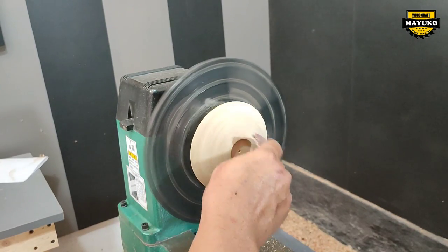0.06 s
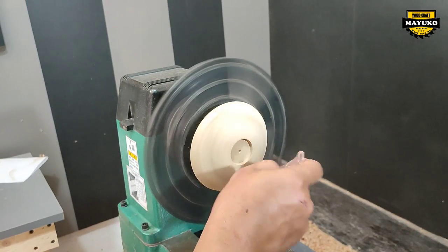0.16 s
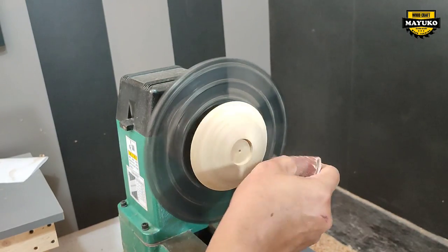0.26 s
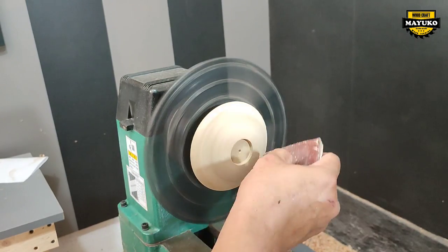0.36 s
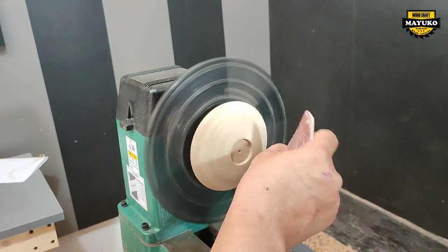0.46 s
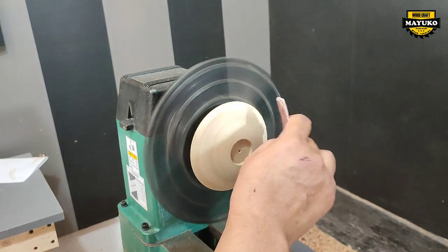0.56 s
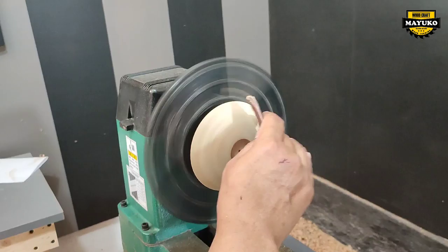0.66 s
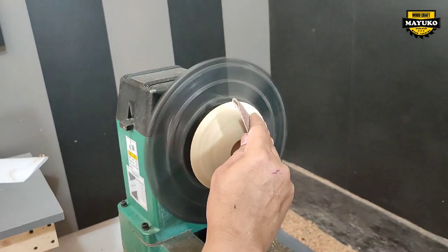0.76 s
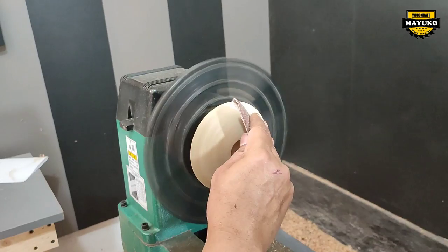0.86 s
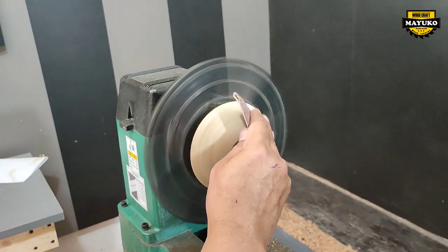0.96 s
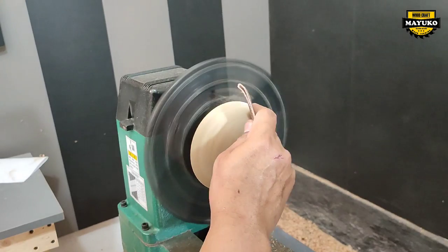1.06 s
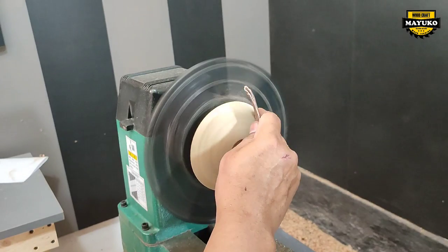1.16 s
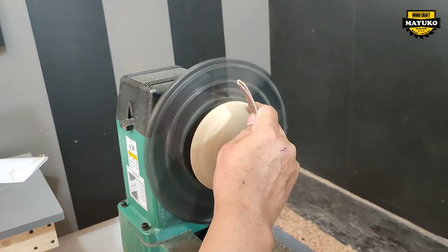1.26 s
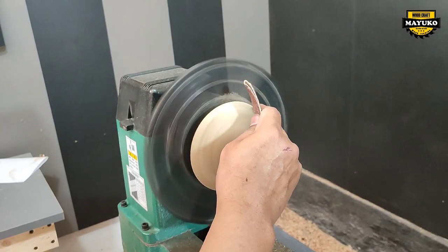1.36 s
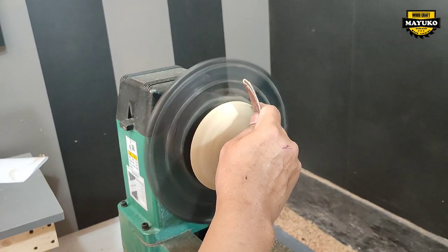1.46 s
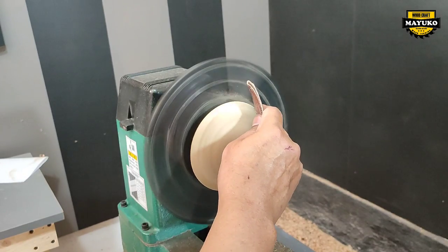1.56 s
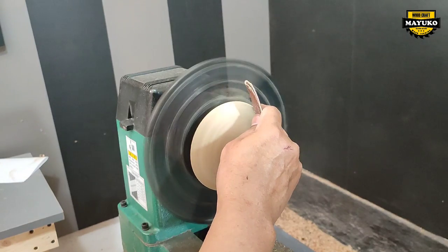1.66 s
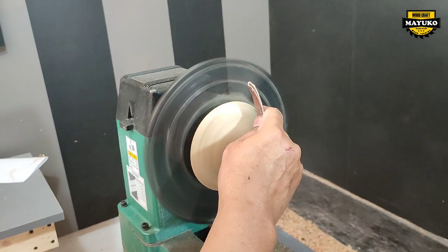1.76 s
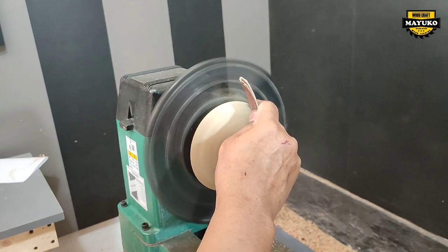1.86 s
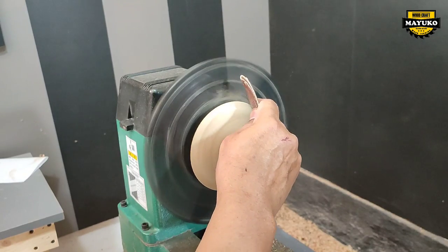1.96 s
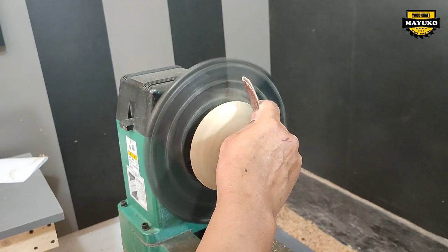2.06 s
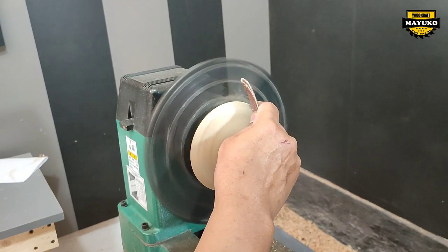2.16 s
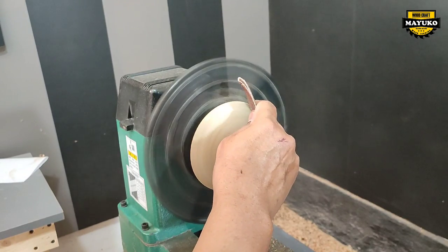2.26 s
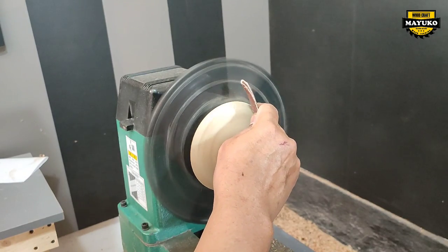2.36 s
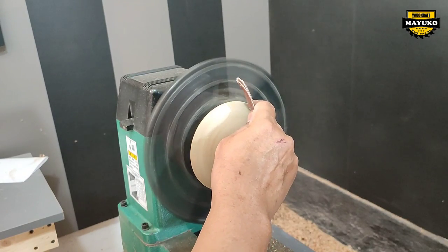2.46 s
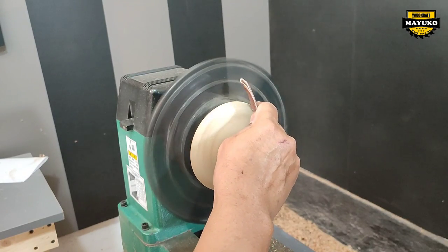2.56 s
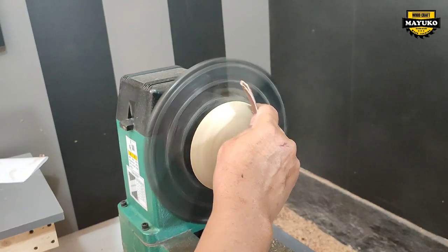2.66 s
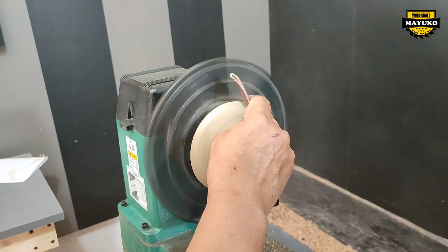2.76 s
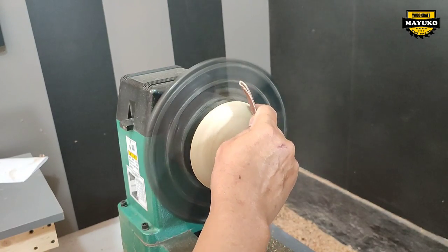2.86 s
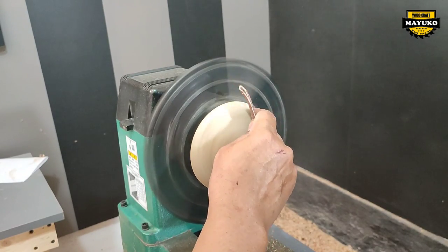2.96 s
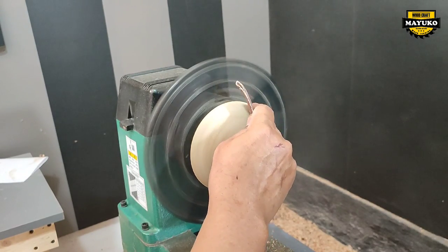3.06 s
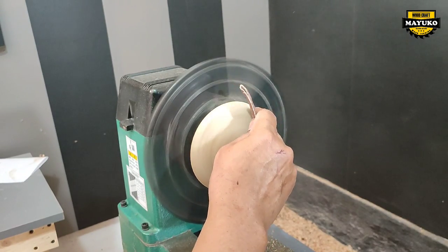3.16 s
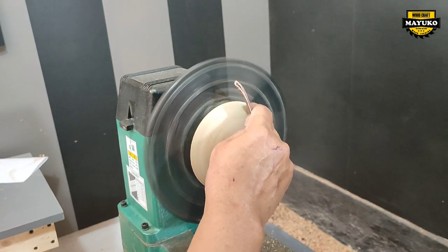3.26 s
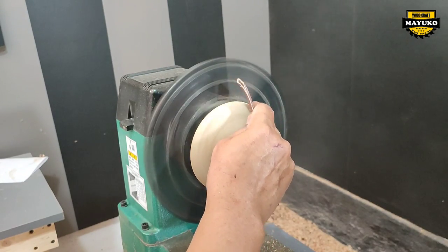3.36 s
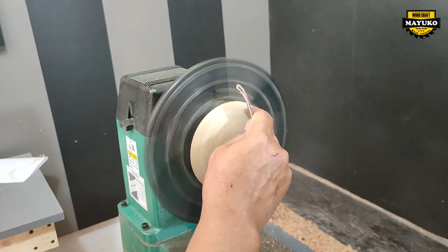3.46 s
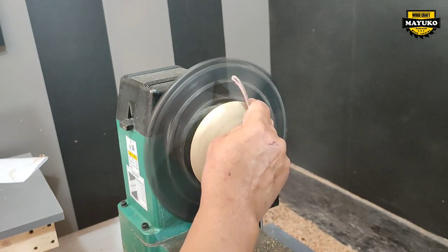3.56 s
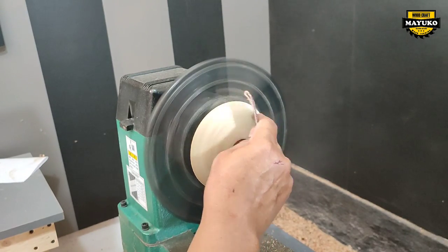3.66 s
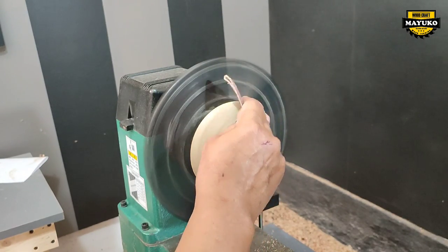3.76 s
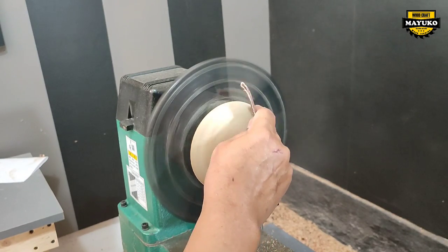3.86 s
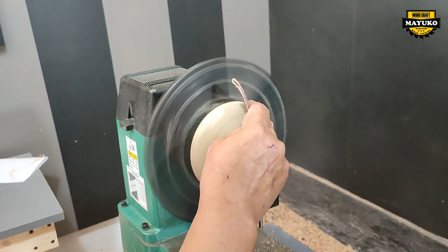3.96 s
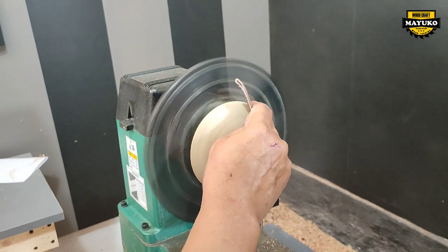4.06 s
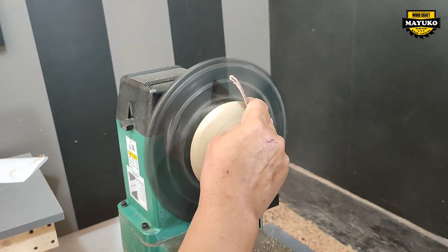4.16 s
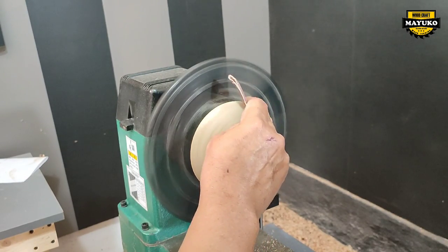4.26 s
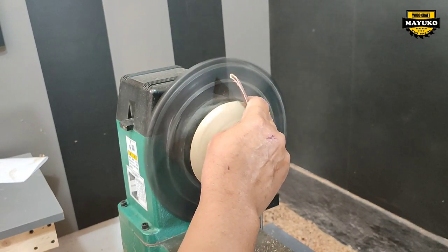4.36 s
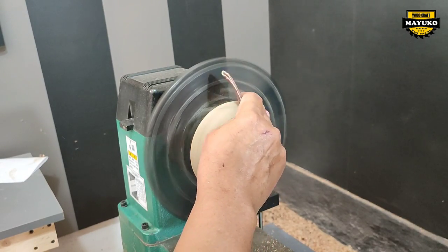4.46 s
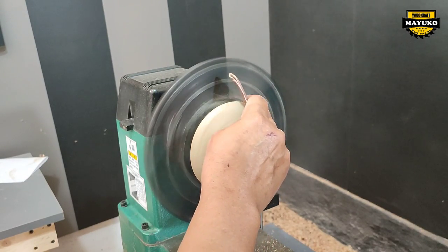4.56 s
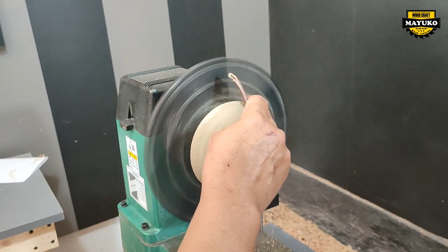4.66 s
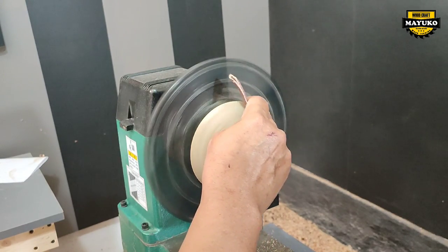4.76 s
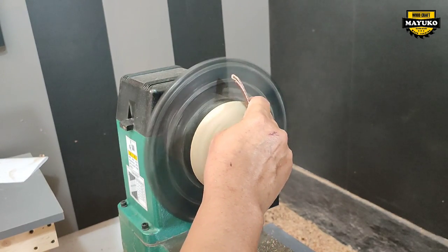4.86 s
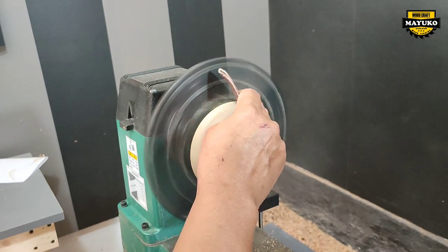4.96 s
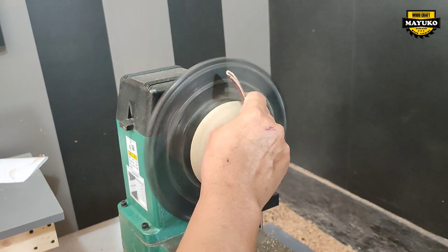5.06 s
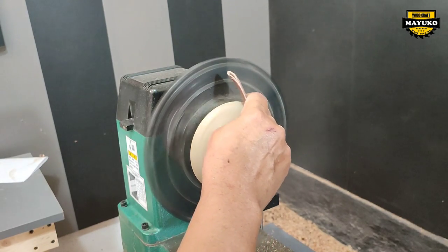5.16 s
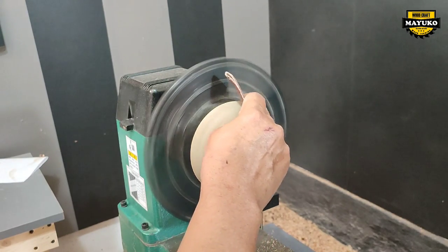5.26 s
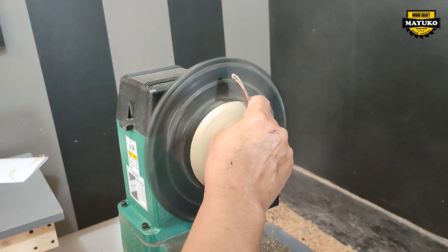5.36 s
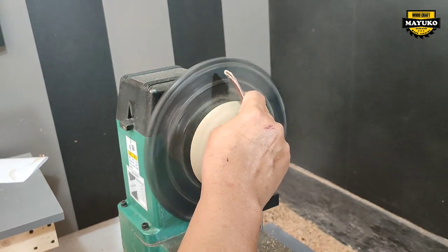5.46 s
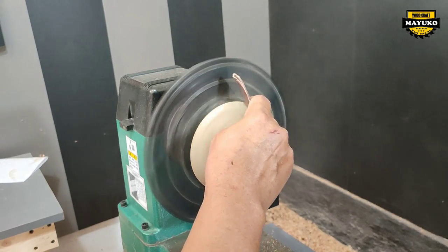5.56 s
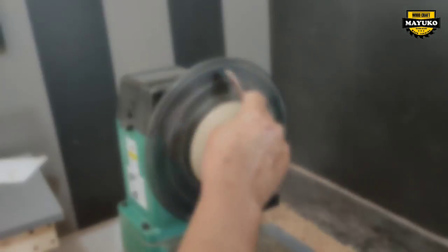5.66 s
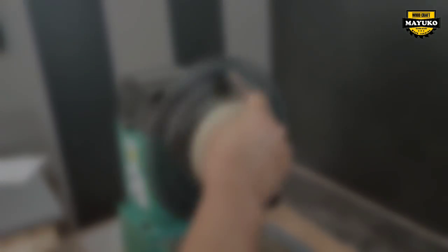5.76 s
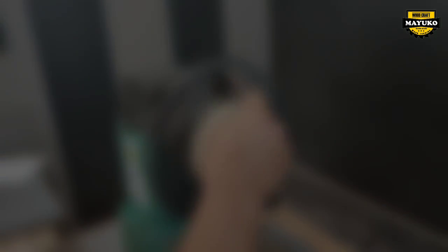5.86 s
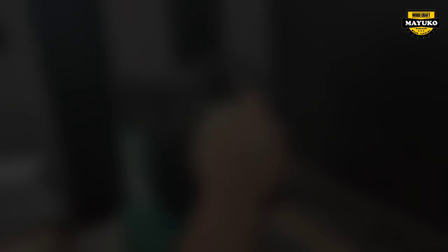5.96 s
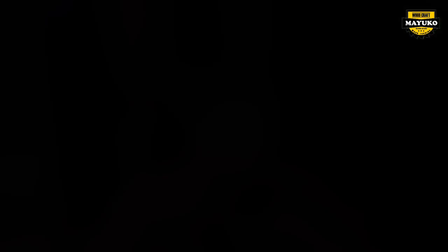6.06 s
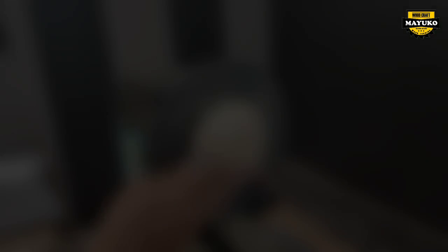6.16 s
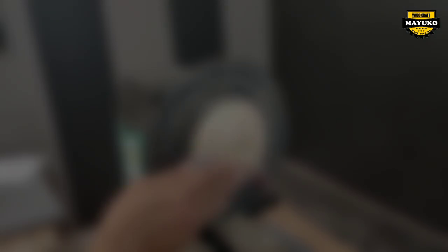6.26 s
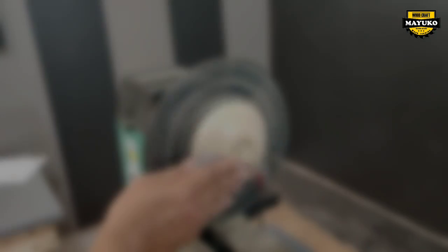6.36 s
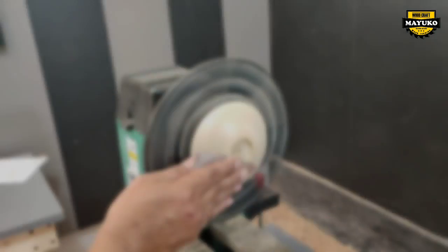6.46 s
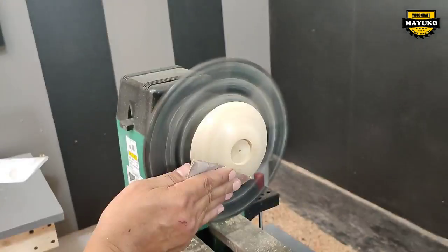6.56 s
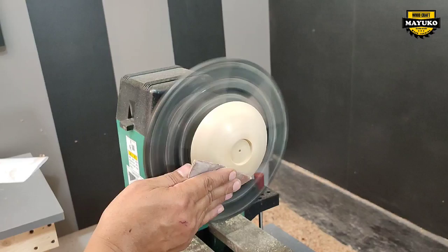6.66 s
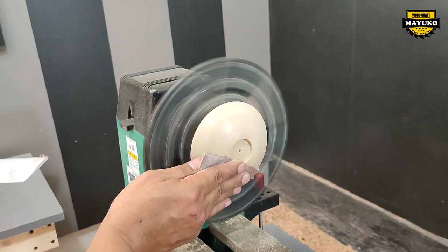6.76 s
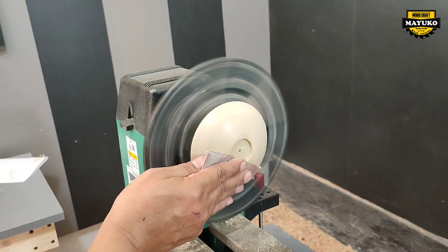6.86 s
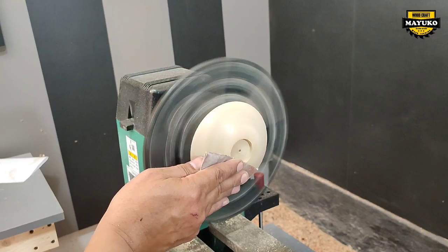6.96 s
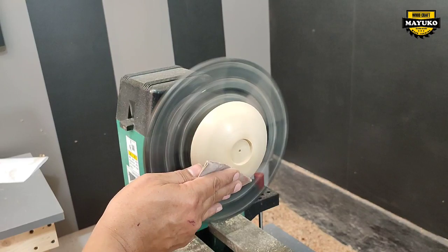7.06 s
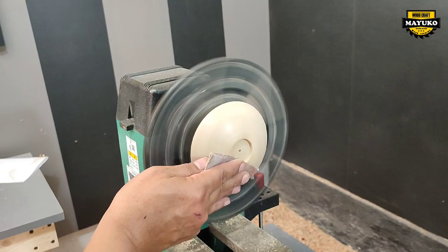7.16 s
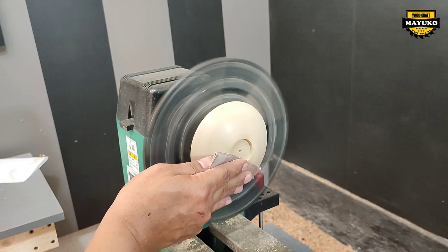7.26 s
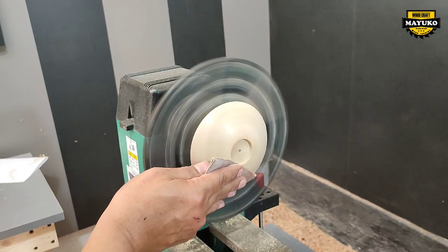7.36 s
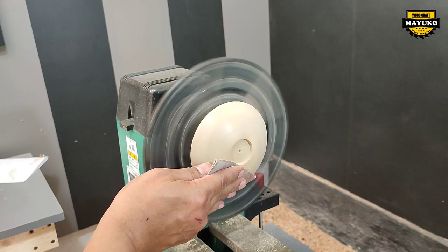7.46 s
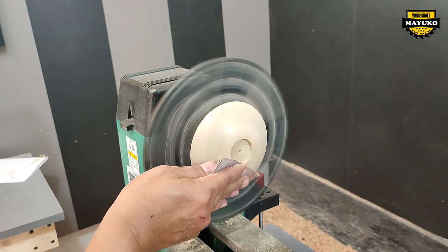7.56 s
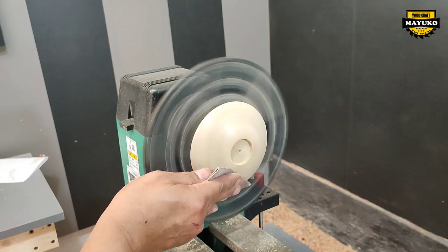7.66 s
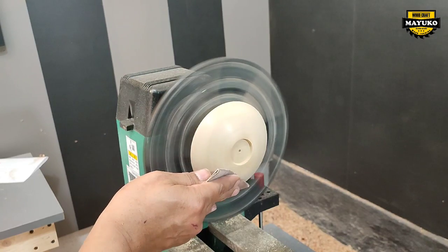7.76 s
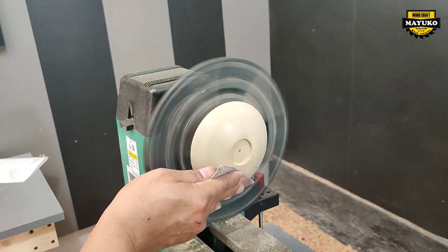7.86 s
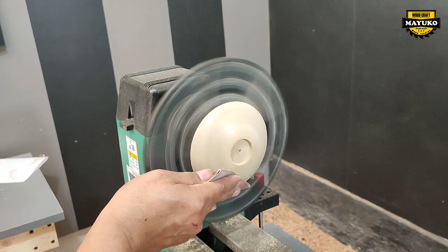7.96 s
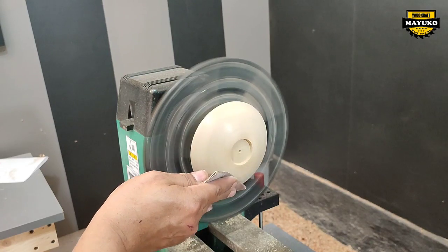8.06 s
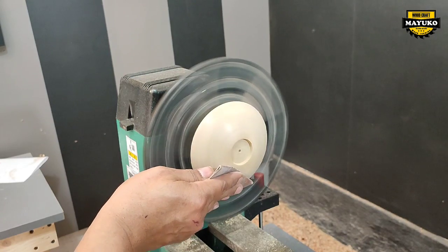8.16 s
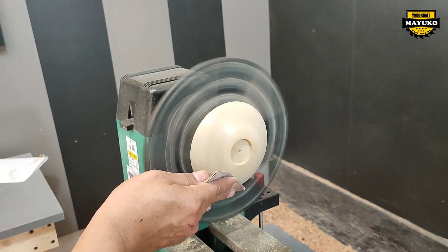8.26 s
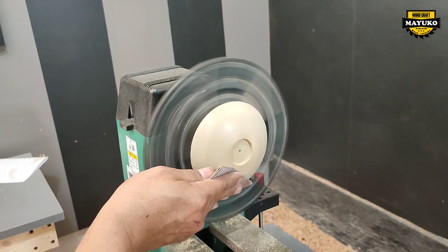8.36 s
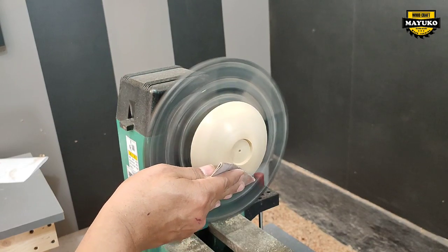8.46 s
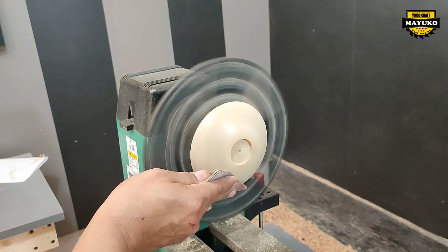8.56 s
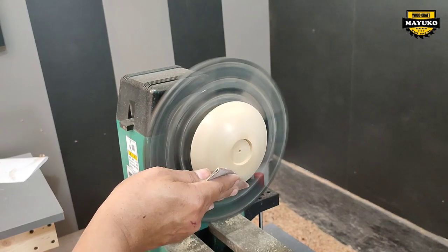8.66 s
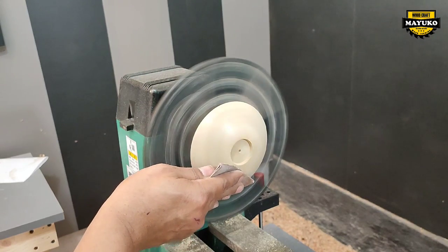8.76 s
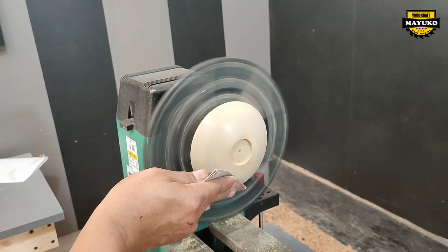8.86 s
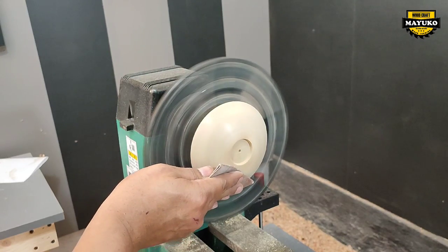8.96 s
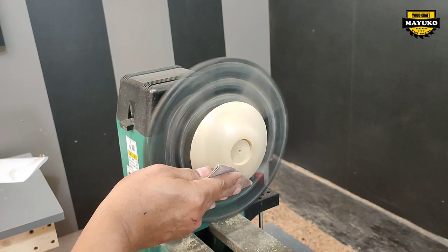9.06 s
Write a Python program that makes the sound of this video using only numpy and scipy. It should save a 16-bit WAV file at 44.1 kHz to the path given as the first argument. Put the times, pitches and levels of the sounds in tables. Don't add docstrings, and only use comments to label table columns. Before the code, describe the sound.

A wood lathe runs throughout, heard close in a small workshop: steady electric hum, many slightly wavering motor and belt tones, airy fan and bearing whirr, and lumpy low rumble. At the start coarse sandpaper hisses loudly on the spinning bowl, then lifts at about 0.2 s with a quick short tail, leaving the motor alone. At 0.84 s the paper touches again with a small woody knock, and by about 0.95 s it is pressing firmly. A dense, bright, gritty hiss continues to 6.1 s, throbbing about thirty times a second with the grain, its pressure varying slightly; the bowl's midrange ringing grows as the paper seats, the motor sags a little and low thuds join. At 6.1 s an abrupt cut with a slight click drops the level sharply: fine paper rubs with a soft, smooth, fluttering hiss, easing slightly until the end at about 9 s, the motor now clearly exposed.

```python
import sys
import numpy as np
from scipy import signal
from scipy.fft import rfft, irfft
from scipy.io import wavfile
from scipy.ndimage import uniform_filter1d

SR = 44100
rng = np.random.default_rng(int(sys.argv[2]) if len(sys.argv) > 2 else 0)


def waveform_to_disk(signal):
    frames = np.transpose(np.atleast_2d(signal))
    scaled = np.clip(frames, -1, 1) * 32767
    samples = np.round(scaled).astype(np.int16)
    wavfile.write(sys.argv[1], SR, samples)


def elevation(decibels):
    levels = np.asarray(decibels, float)
    return 10 ** (levels / 20)


N = 401306

# frequency in Hz, left level in dB, right level in dB.
COARSE_HISS = [(900, -19.5, -26.5), (1500, -16.5, -14), (2130, -7.5, -12), (3470, -5.5, -3),
               (4900, -5.5, -3.5), (4990, -3.5, -1.5), (5940, -1.5, -2), (7510, 0.5, 4.5), (8030, -0.5, -2),
               (8600, 0.5, -8), (9330, -6, -4.5), (10020, -11.5, -10), (12200, -9.5, -8), (15400, -13, -11)]
# frequency in Hz, left level in dB, right level in dB.
FINE_HISS = [(1500, -9, -2), (3400, -4, -2.5), (5830, -3.5, -4), (6650, 0, -1), (7400, -1, 3.5),
             (8400, -2, -6.5), (10100, -6, -4.5), (12100, -5, -3.5), (14400, -4, -4.5)]
# frequency in Hz, likeness from -1 to 1.
HISS_SAME = [(900, 0.11), (1500, -0.28), (2000, 0.73), (2600, 0.21), (3300, 0.013), (4300, -0.048),
             (5400, -0.14), (6500, -0.057), (14300, -0.048)]
# time in s, hiss level in dB.
PRESSURE = [(0.843, -53), (0.873, -38.5), (0.9, -42.5), (0.935, -30), (1.08, -29.5), (1.14, -31),
            (1.45, -30.5), (1.7, -28.5), (2.9, -29.5), (3.19, -30.5), (3.5, -30.5), (4.05, -31), (4.8, -30),
            (5.3, -30), (5.6, -31), (5.85, -29.5), (6.13, -29.5)]
# frequency in Hz, width in Hz, level in dB, left minus right in dB,
# left-right likeness from 0 to 1.
BOWL = [(1787, 183, -5.5, -0.5, 0.56), (1937, 57, -2.5, 2, 0.88), (2160, 130, -9.5, 4, 0.12),
        (2497, 270, -7.5, 1.5, 0.68), (2982, 172, 0.5, -6, 0.39), (3140, 133, -4.5, 0.5, 0.38)]
# time in s, resonance in Hz, level in dB re hiss.
HAND_GAP = [(0, 6800, -12), (1, 6940, -6), (2, 7800, -22), (3.5, 7700, -13), (4.5, 8640, -6.5),
            (6.2, 8600, -6.5)]
# frequency in Hz, width in Hz, level in dB.
CANCELS = [(2280, 50, -4), (3335, 45, -6)]
# times a turn, depth in dB, phase in radians.
HISS_THROB = [(1, 0.43, 1.5), (2, 1.01, -2.5), (4, 0.37, 4.5)]
BOWL_THROB = [(1, 0.32, 0.44), (2, 1.8, 3.6), (4, 0.25, 0.16)]
FINE_THROB = [(1, .3, 1.1), (2, 0.97, 7.5), (4, .15, -8)]
# frequency in Hz, level in dB, left minus right in dB, left lead in
TONES = [(47.3, -65.0, 4.0, 0.2, 0.95), (60.7, -64.0, 8.0, 0.3, 0.95), (100.0, -58.0, -0.0, 0.0, 0.35),
         (122.7, -68.0, 1.0, -0.0, 0.92), (199.0, -60.5, 2.0, -0.1, 0.7), (230.6, -65.0, -0.0, 0.1, 0.95),
         (248.5, -66.0, 0.0, -0.2, 0.95), (299.0, -66.0, -0.0, -0.5, 0.75), (331.5, -49.0, 4.0, -0.6, 0.47),
         (346.4, -50.0, -1.0, -0.3, 0.54), (360.5, -62.0, 3.0, 0.0, 0.81), (370.2, -62.0, 6.0, -0.1, 0.78),
         (381.5, -65.0, 1.0, -0.1, 0.89), (400.1, -49.0, -4.0, 0.4, 0.3), (442.0, -57.0, 3.0, -0.6, 0.65),
         (471.5, -62.0, 7.0, -0.3, 0.9), (499.5, -63.0, 4.0, -0.2, 0.9),
              (511.5, -62.0, 1.0, -0.8, 0.7), (548.9, -60.0, 7.0, 1.8, 0.82),
              (570.4, -63.0, -7.0, -1.2, 0.64), (595.4, -64.0, 5.0, 0.1, 0.82),
              (620.2, -59.0, 5.0, 0.7, 0.95), (649.3, -63.0, 5.0, 1.1, 0.95), (670.0, -55.5, 14, 0.6, 0.95),
              (700.0, -55.0, 4.0, -0.4, 0.85), (725.1, -68.0, 6.0, -0.5, 0.72),
              (940.8, -71, 2.0, -1.3, 0.95), (1213.9, -65.0, 4.0, 1.1, 0.88),
              (1227.7, -66.0, 4.0, 1.3, 0.9), (1479.2, -66.0, 6.0, -0.5, 0.82)]
# frequency in Hz, level in dB per Hz.
WHIRR = [(20, -10.5), (60, -32), (85, -23), (220, -13), (340, -13), (420, -12.5), (650, -12.5),
         (900, -18.5), (1600, -17), (2100, -25), (4500, -37), (7500, -37), (8500, -43), (14300, -46.5)]
# frequency in Hz, likeness from -1 to 1.
WHIRR_SAME = [(60, 0.94), (130, 1), (290, 0.51), (640, -0.17), (1400, -0.00063), (3090, -0.062),
              (6790, -0.15), (14900, -0.07)]
# frequency in Hz, width in Hz, level in dB.
HOUSING = [(2470, 115, -62), (3000, 120, -65.5)]
# treble in dB re its loudest, margin in
# dB, extra margin above 5.3 kHz in dB.
WEAK_MARGIN = [(-40, 8, -5.5), (-30, 3.8, .3), (-13, 4.2, .3), (-7, 1.9, 2.4)]

COARSE_TURN_HZ, FINE_TURN_HZ = 14.98, 14.94
TOUCH_S, CHANGE_S = 0.8405, 6.135
HELD_DB, LIFT_S, LIFT_DB_PER_S, TAIL_DB, TAIL_DB_PER_S = -32, 0.18, 225, -4, 102
RING_HELD_DB, RING_LIFTED_DB, RING_DB, RING_WANDER_DB = -3, -8.5, -4.5, 1.5
DAMPED_DB, SEAT_S = -17.5, 0.48
KNOCK_DB, KNOCK_DB_PER_S, KNOCK_RISE_S = -38.5, 70, 0.017
GRIT_DB, GRIT_PER_DB, GRIT_UNSEATED_DB, GRIT_SEAT_S = -1.13, 0.3, -5.5, 0.28
HAND_WANDER_DB = 0.5
FINE_DB, FINE_SAG_DB_PER_S, FINE_WANDER_DB, FINE_RISE_S = -55.5, 0.34, 0.3, 0.018
ROTOR_HZ, MAINS_HUM_HZ = 24.8, 100
BELT_LAP_HZ, BELT_LAP_DB, BELT_LAP_RAD = 2.3, 0.5, 0.3
SHAKE_DB, SHAKE_PRESSED_DB, SHAKE_PER_DB, GUST_DB = -54.5, 3.5, 2.5, 2


def column(rows, k, at):
    rows = np.asarray(rows)
    return np.interp(at, rows[:, 0], rows[:, k])


def column_by_pitch(rows, k, hz):
    rows = np.asarray(rows)
    return np.interp(np.log(hz + 1), np.log(rows[:, 0]), rows[:, k])


def evened(x):
    return x / np.sqrt(np.mean(np.abs(x) ** 2) + 1e-20)


def pair(same):
    a, b = rfft(rng.standard_normal((2, N)))
    same = np.clip(same, -1, 1)
    return np.array([a, same * a + np.sqrt(1 - same ** 2) * b])


def drift(rate_hz, count):
    knots = rng.standard_normal((count, int(N / SR * rate_hz) + 4))
    at = np.arange(N) / SR * rate_hz
    k = at.astype(int)
    ease = 0.5 - 0.5 * np.cos(np.pi * (at % 1))
    return evened(knots[:, k] * (1 - ease) + knots[:, k + 1] * ease)


def resonate(x, hz, width):
    turn = np.exp(2j * np.pi * np.cumsum(hz * np.ones(N)) / SR)
    r = np.exp(-np.pi * width / SR)
    return 2 * (turn * signal.lfilter([1 - r], [1, -r], x / turn)).real


def throb(rows, turn_hz):
    angle = 2 * np.pi * turn_hz * np.arange(N) / SR + 0.27 * drift(1.28, count=1)[0]
    return elevation(sum(db * np.cos(k * angle + phase) for k, db, phase in rows))


def grit(colour, patchy_db, flicker_db, same):
    hz = np.fft.rfftfreq(512, 1 / SR)
    z = signal.stft(irfft(pair(same), N), nperseg=512, noverlap=384)[2]
    patches = uniform_filter1d(rng.standard_normal(z.shape), size=6, axis=1)
    patches = uniform_filter1d(patches, size=18, axis=2)
    tone_db = np.array([column_by_pitch(colour, side, hz) for side in (1, 2)])
    z = z * elevation(tone_db[:, :, None] + patchy_db * evened(patches)) * (hz > 600)[:, None]
    hiss = signal.istft(z, nperseg=512, noverlap=384)[1][:, :N]
    return evened(hiss) * elevation(flicker_db * (drift(14, count=1) + 0.91 * drift(150, count=1)))


def pressure_db(t):
    since = np.maximum(t - LIFT_S, 0)
    quick = elevation(-LIFT_DB_PER_S * since)
    tail = elevation(TAIL_DB - TAIL_DB_PER_S * since)
    first_db = HELD_DB + 10 * np.log10((quick ** 2 + tail ** 2) / (1 + elevation(2 * TAIL_DB)))
    return np.where(t < TOUCH_S, first_db, column(PRESSURE, 1, t))


def coarse_hiss(level_db):
    t, hz = np.arange(N) / SR, np.fft.rfftfreq(N, 1 / SR)
    since = np.maximum(t - TOUCH_S, 0)
    hiss = grit(COARSE_HISS, patchy_db=1.47, flicker_db=0.0, same=column(HISS_SAME, 1, hz))
    top = irfft(rfft(hiss) * np.clip((hz - 9000) / 800, 0, 1), N)
    grit_db = GRIT_DB - GRIT_PER_DB * np.clip(-31.5 - level_db, 0, 25)
    grit_db = grit_db + (t > TOUCH_S) * GRIT_UNSEATED_DB * np.exp(-(since / GRIT_SEAT_S) ** 2)
    hiss = hiss + top * (elevation(grit_db + 6.5) - 1)
    dull = irfft(rfft(hiss) * np.exp(-((hz - 3900) / 1300) ** 2), N)
    hiss = hiss + dull * (elevation(0.17 * np.clip(-30.5 - level_db, 0, 25)) - 1)
    gap_hz = column(HAND_GAP, 1, t)
    gap = resonate(resonate(rng.standard_normal(N), gap_hz, 900), gap_hz, 900)
    hiss[0] += elevation(column(HAND_GAP, 2, t)) * evened(gap)
    return elevation(5.0 + HAND_WANDER_DB * drift(8, count=1)) * hiss * throb(HISS_THROB, COARSE_TURN_HZ)


def bowl_ring(level_db):
    t = np.arange(N) / SR
    since = np.maximum(t - TOUCH_S, 0)
    ring = 0
    for mode_hz, width, db, pan_db, same in BOWL:
        side = elevation([[pan_db / 2], [-pan_db / 2]])
        flutter = mode_hz * (1 + 0.0084 * drift(25, count=1)[0])
        rung = resonate(irfft(pair(same), N), flutter, 1.4 * width)
        rung = resonate(rung, flutter, 1.4 * width)
        ring = ring + evened(rung) * side * elevation(db + 1.7 * drift(28, count=1))
    seated = elevation(RING_DB + DAMPED_DB * np.exp(-since / SEAT_S))
    knock = elevation(KNOCK_DB - KNOCK_DB_PER_S * since - level_db) * np.minimum(since / KNOCK_RISE_S, 1)
    first = elevation(np.where(t < LIFT_S, RING_HELD_DB, RING_LIFTED_DB))
    gain = np.where(t > TOUCH_S, np.hypot(seated, knock), first)
    gain = gain * elevation(0.82 + RING_WANDER_DB * drift(9, count=1))
    return evened(ring) * gain * throb(BOWL_THROB, COARSE_TURN_HZ)


def coarse_paper():
    hz = np.fft.rfftfreq(N, 1 / SR)
    level_db = pressure_db(np.arange(N) / SR)
    both = coarse_hiss(level_db) + bowl_ring(level_db)
    dips_db = sum(db / (1 + ((hz - dip_hz) / width) ** 2) for dip_hz, width, db in CANCELS)
    both = irfft(rfft(both) * elevation(dips_db), N)
    return both * uniform_filter1d(elevation(level_db), size=300)


def fine_paper():
    since = np.maximum(np.arange(N) / SR - CHANGE_S, 0)
    hiss = grit(FINE_HISS, patchy_db=0.3, flicker_db=0.1, same=-0.093) * throb(FINE_THROB, FINE_TURN_HZ)
    strokes_db = FINE_DB - FINE_SAG_DB_PER_S * since + FINE_WANDER_DB * drift(11, count=1)
    return hiss * elevation(strokes_db + 9.0) * np.minimum(since / FINE_RISE_S, 1)


def weak_rotor_tones():
    orders = np.arange(30, 72)
    luck = rng.random((len(orders), 3))
    level_db = -78 + 6.5 * luck[:, 0] + 4.5 * (orders < 35)
    pan_db, lead = 12 * luck[:, 1] - 6, 3.1 * luck[:, 2] - 1.5
    return np.c_[orders * ROTOR_HZ, level_db, pan_db, lead, 0 * orders + 0.8]


def motor_tones(step=8):
    t = np.arange(0, N + step, step) / SR
    load = np.interp(t, [0, 0.9, 1.6, CHANGE_S, CHANGE_S + 0.01], [0, 0.013, 1, 0.99, 0.45])
    clock = np.cumsum(1 - 0.00323 * (load - 0.7)) * step / SR
    belt_db = BELT_LAP_DB * np.cos(2 * np.pi * BELT_LAP_HZ * t + BELT_LAP_RAD)
    out = np.zeros((2, len(t)))
    for hz, db, pan_db, lead, share in np.vstack([TONES, weak_rotor_tones()]):
        locked = abs(hz / MAINS_HUM_HZ - round(hz / MAINS_HUM_HZ)) < 0.004
        knots = rng.standard_normal((70, 2)) @ [1, 1j] / np.sqrt(2)
        waver = np.interp(t, np.linspace(0, t[-1], len(knots)), knots) * 1.49
        share = share ** 2 * (0.15 if locked else 0.55 + 0.45 * share ** 2)
        cycles = hz * (t if locked else clock) + rng.random()
        tone = (np.sqrt(1 - share) + np.sqrt(share) * waver) * np.exp(2j * np.pi * cycles)
        right = np.sqrt(2 / (1 + elevation(2 * pan_db)))
        pull_db = 2.5 * (load - 0.6) * (locked and hz > 300)
        gain = np.sqrt(2) * elevation(db + pull_db + (not locked) * belt_db) * right
        out += gain * np.array([elevation(pan_db) * (tone * np.exp(1j * lead)).real, tone.real])
    return signal.resample_poly(out, step, 1, axis=1)[:, :N]


def motor_whirr():
    hz = np.fft.rfftfreq(N, 1 / SR)
    air = pair(column_by_pitch(WHIRR_SAME, 1, hz)) * elevation(column_by_pitch(WHIRR, 1, hz))
    whirr = elevation(-47) * evened(irfft(air, N))
    for mode_hz, width, db in HOUSING:
        cover = pair(0.15) / (1 + ((hz - mode_hz) / width * 1.24) ** 2)
        whirr += elevation(db) * evened(irfft(cover, N))
    return whirr * elevation(1.2 * drift(7.4, count=1))


def shake():
    t, hz = np.arange(N) / SR, np.fft.rfftfreq(N, 1 / SR)
    lumps = evened(irfft(pair(0.17) * (hz > 2) / (1 + (hz / 30) ** 2), N))
    angle = 2 * np.pi * COARSE_TURN_HZ * t
    waver = drift(3.2, count=2)
    thuds = elevation(-2.0 + 2.0 * waver[0]) * np.cos(2 * angle)
    thuds = thuds + elevation(-14 + 4.1 * waver[1]) * np.cos(4 * angle)
    pressing = np.interp(t, [0.9, 1.7, CHANGE_S, CHANGE_S + 0.01], [0, 1, 1, 0])
    right = elevation(-1 - 5 * pressing)
    pressed_db = pressing * (SHAKE_PRESSED_DB + SHAKE_PER_DB * (pressure_db(t) + 30.5))
    level_db = SHAKE_DB + pressed_db + GUST_DB * drift(8, count=1)[0]
    return elevation(level_db + 1.0) * (lumps * [1 + 0 * t, right] + pressing * thuds * [[1], [0.2]])


def scene():
    edge = signal.firwin(1023, 14290, window=("kaiser", 9), fs=SR)[None]
    sources = (coarse_paper(), fine_paper(), motor_whirr())
    coarse, fine, whirr = (signal.oaconvolve(x, edge, "same", axes=1) for x in sources)
    paper = np.where(np.arange(N) / SR < CHANGE_S, coarse, fine)
    return paper + whirr + motor_tones() + shake()


def drop_weak_bands(x):
    lead = 1024 - 490
    window = signal.windows.cosine(2048)
    turn = np.array([[1, 1], [1, -0.96]]) / np.sqrt(2)
    padded = np.pad(turn @ x, ((0, 0), (lead, 0)))
    hz, _, z = signal.stft(padded, SR, window, nperseg=2048, noverlap=1024)
    power = (abs(z[:, :1024]) ** 2).reshape(2, 512, 2, -1).mean(2)
    power = uniform_filter1d(power, size=3, axis=2)
    usual = uniform_filter1d(power, size=11, axis=2) * 1.6
    mask = np.minimum(uniform_filter1d(power.mean(0), size=71, axis=0), usual)
    treble = power[:, 80:].mean((0, 1)) + 1e-20
    treble_db = 10 * np.log10(treble / treble.max())
    high = (hz[:1024:2] > 5300)[:, None]
    margin_db = column(WEAK_MARGIN, 1, treble_db) + column(WEAK_MARGIN, 2, treble_db) * high
    weak = np.repeat(power < mask * elevation(-2 * margin_db), 2, axis=1)
    z[:, :1024] *= 1 - weak * (hz[:1024] > 2050)[:, None]
    kept = signal.istft(z, SR, window, nperseg=2048, noverlap=1024)[1]
    return turn @ kept[:, lead:lead + N]


def roll_off(x):
    return signal.sosfilt(signal.butter(12, 15540, fs=SR, output="sos"), x)


def record(dry):
    mix = drop_weak_bands(dry)
    return roll_off(mix)


dry = scene()
out = record(dry)
waveform_to_disk(out)
```